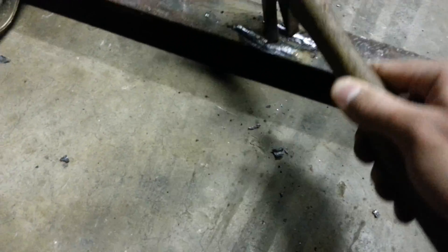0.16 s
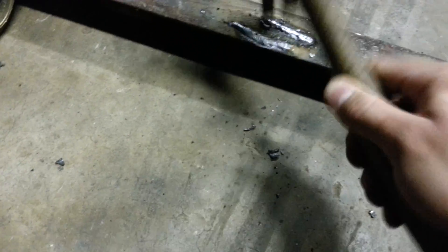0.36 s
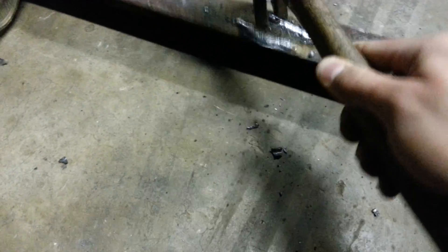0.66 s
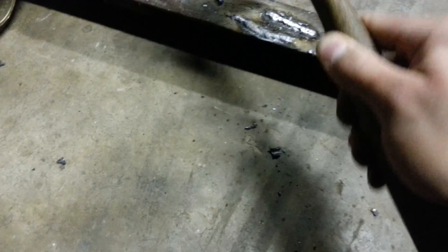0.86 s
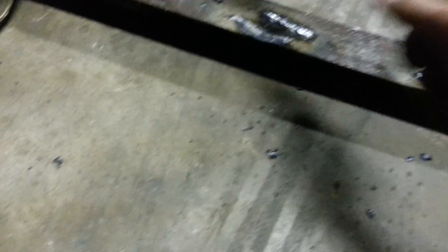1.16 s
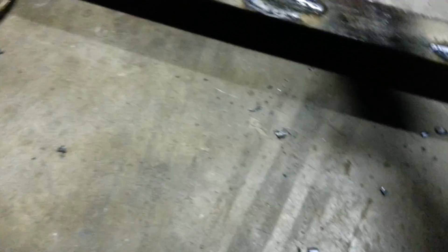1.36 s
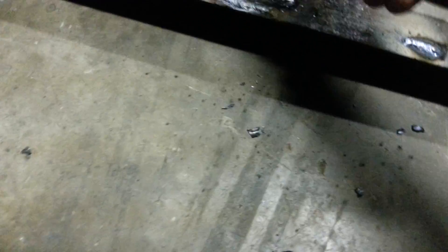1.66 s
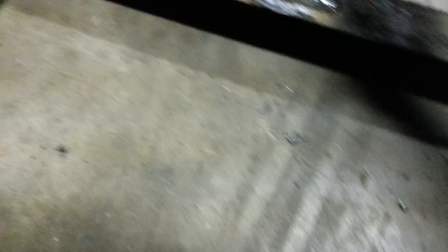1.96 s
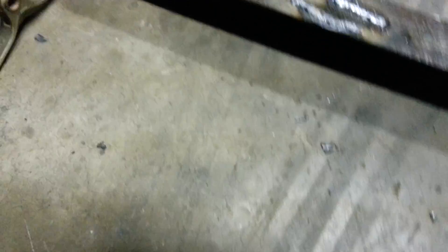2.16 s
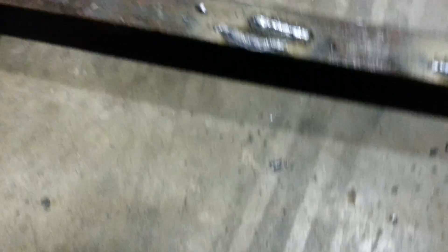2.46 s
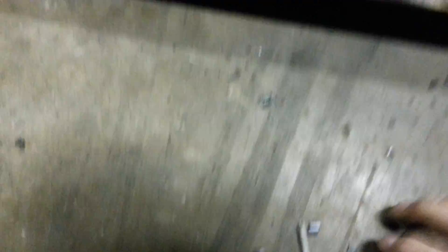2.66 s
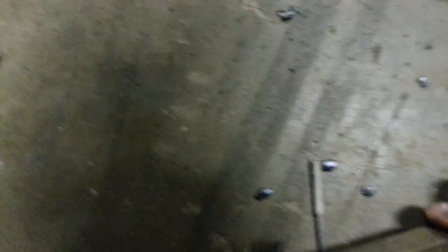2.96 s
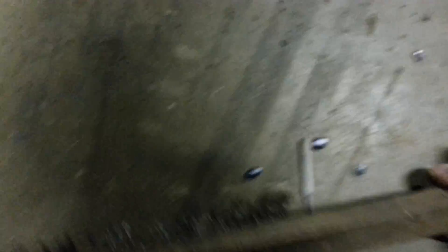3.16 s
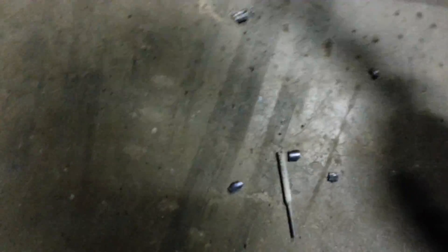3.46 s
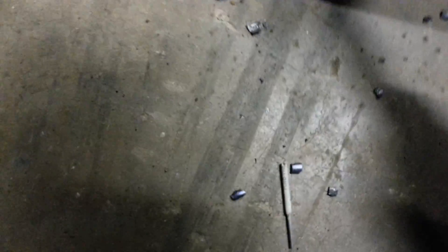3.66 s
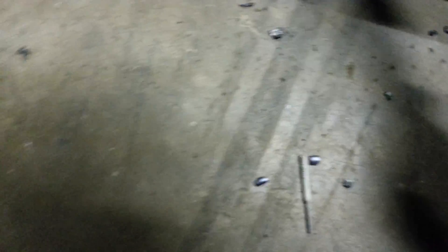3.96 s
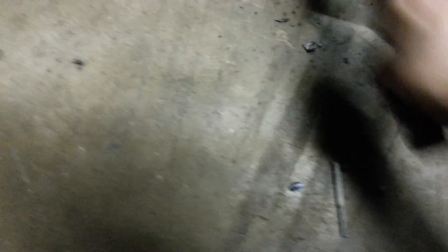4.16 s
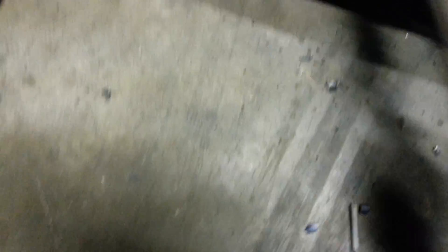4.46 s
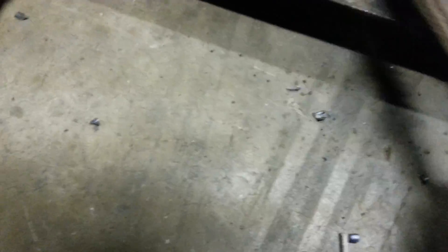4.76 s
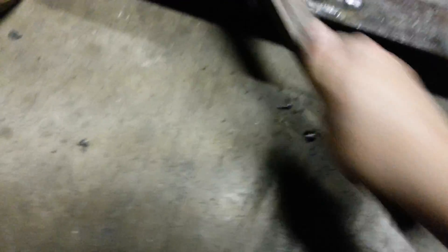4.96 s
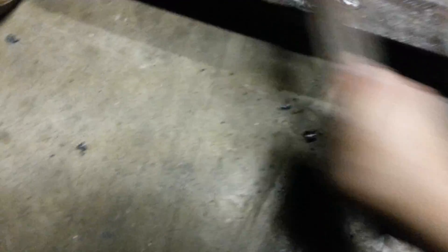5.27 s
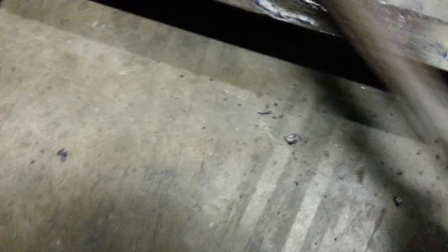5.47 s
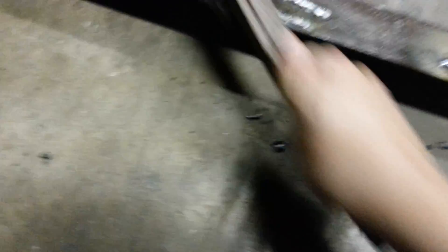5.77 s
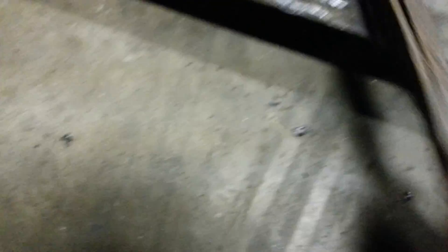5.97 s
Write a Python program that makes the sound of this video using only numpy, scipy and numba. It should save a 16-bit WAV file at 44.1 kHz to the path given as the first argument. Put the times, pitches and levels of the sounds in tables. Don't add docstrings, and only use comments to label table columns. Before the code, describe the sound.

Close, clipped hammering on ringing steel, the hammer set down and bouncing to rest, a short wooden drag, then brisk to-and-fro wire-brush scrubbing.

```python
import sys
import numpy as np
from scipy import signal
from scipy.fft import rfft, irfft
from scipy.io import wavfile
from scipy.ndimage import uniform_filter1d
from numba import njit

SR = 44100
rng = np.random.default_rng(int(sys.argv[2]) if len(sys.argv) > 2 else 0)


def transcribe(signal):
    frames = np.atleast_2d(signal).T
    limited = np.clip(frames, -1, 1)
    pcm = np.round(limited * 32767).astype(np.int16)
    wavfile.write(sys.argv[1], SR, pcm)


def natural_amplitude(level_db):
    exponent = np.asarray(level_db, float) / 20
    return 10 ** exponent


N = 269892
HZ = np.arange(N // 2 + 1) * SR / N

# frequency in Hz, density in dB per Hz.
ROOM_COLOUR = [(18, -46), (30, -25), (75, -3.5), (154, -6), (228, -8.5), (296, -6), (415, -14), (581, -10),
               (774, -12), (2700, -17), (5730, -30), (12200, -28.5), (15000, -25)]
ROOM_DB, ROOM_WAVER_DB = -49.5, 0.8
# time in seconds, level in dB.
MACHINE_LEVEL = [
    (0, -46),
    (1.4, -42),
    (2.2, -45.5),
    (3.0, -43.5),
    (3.3, -51.5),
    (3.6, -85.5),
    (6.12, -59.5),
]
# frequency in Hz, density in dB per Hz.
MACHINE_COLOUR = [(35, -40.5), (60, -23), (79, -13.5), (122, -18.5), (194, 0), (404, -1), (727, 1),
                  (1480, -6), (1680, -11.5), (9000, -41.5), (11700, -79.5), (19800, -120)]
# frequency in Hz, left-right likeness from 0 to 1.
PORT_LIKENESS = [(60, 0.7), (130, 0), (290, 0.55), (640, 0.5), (1410, 0), (3090, 0), (6800, 0), (15000, 0)]
# frequency in Hz, left minus right in dB.
PORT_LEAN = [(60, -1), (110, 1.5), (200, 1), (380, 3.5), (700, -2), (1290, 0.5), (2380, 4.5), (4390, 11),
             (8110, 2), (15000, -1)]
TOP_HZ = 14750
# frequency in Hz, threshold against the whole sound in dB.
MUTE_BELOW = [(100, -44), (300, -31), (600, -35.5), (1000, -35), (4000, -44), (8000, -41), (14000, -40.5)]

# time in seconds, peak in dB, pitch in Hz.
EDDIES = [(3.905, -31.5, 152), (4.029, -19, 280), (4.051, -18.5, 201), (4.1, -21.5, 223),
          (4.149, -23.5, 200), (4.981, -19, 194), (4.990, -7.5, 700), (5.005, -10.5, 360),
          (5.015, -11, 176), (5.045, -6.5, 268), (5.183, -26.5, 175), (5.386, -2, 412), (5.417, -3.5, 447),
          (5.45, -16, 252), (5.471, -12, 343), (5.501, -25, 201), (5.512, -18, 342), (5.53, -21.5, 170)]
WAKE_TURNS, WAKE_DB, WAKE_PITCH, WAKE_LOW_HZ = 2.975, -7, 0.584, 170

# frequency in Hz, density in dB per Hz.
DRAG_COLOUR = [(47, -50), (80, -20), (161, -15), (338, -10.5), (624, -1.5), (743, -15), (938, -4),
               (1240, -8), (1430, -3), (1890, -17.5), (2600, -17), (3380, -53.5), (5720, -120)]
DRAG_START_S, DRAG_END_S, DRAG_ATTACK_S, DRAG_RELEASE_S = 2.985, 3.187, 0.04, 0.085
DRAG_DB, DRAG_REST_DB = -24.5, -54.5
DRAG_GRIT_DB, DRAG_DUST_DB = -14, 9

# turn in seconds, pressure in dB.
STROKES = [(4.064, -32), (4.262, -33.5), (4.444, -30.5), (4.628, -32.5), (4.83, -30.5), (5.01, -31.5),
           (5.219, -29.5), (5.397, -31.5), (5.606, -30.5), (5.798, -33), (6.004, -29)]
LAST_TURN_S = 6.2
LANDING_DB = -8
PUSH, PULL = (-16.5, 2, 1.9, -8), (-12.5, -3.5, 1.66, -5.5)
# frequency in Hz, density in dB per Hz.
BRISTLE_COLOUR = [(88, -43), (150, 2.5), (357, -32.5), (515, -4.5), (674, -32.5), (742, -11.5), (1160, -8),
                  (1300, -7.5), (1700, -13.5), (3820, -22.5), (5720, -4), (13900, 4.5), (15000, -10.5)]
TUFT_HZ, TUFT_WIDTH_HZ, TUFT_DB = (1786, 5000, 7680, 10320, 13200), 2600, 3.5
# frequency in Hz, width in Hz, level in dB.
WELD_PEAKS = [(2864, 950, 1), (3276, 25, -12), (3740, 30, -6.5), (3753, 630, -2.06), (4356, 38, -13.5),
              (4500, 530, -7)]
# frequency in Hz, width in Hz, level in dB.
FLANGE_PEAKS = [(523, 82, -15), (667, 17, -9.5), (1080, 220, -9), (1174.3, 15, 4.5), (1828, 18, -7.5),
                (2046, 35, -7.5), (2267, 46, -4.5)]

# time in seconds, level in dB.
KNOCKS = [
    (3.59, -57),
    (3.787, -45),
    (3.94, -57.5),
    (4.0329, -36.5),
    (4.045, -54),
    (4.0733, -37),
    (4.564, -36),
    (4.671, -46),
    (5.64, -46.5),
]
# time in seconds, level in dB, decay share, swarm in dB, crack in dB.
BRUSH_RAP = [
    (3.0779, -34, 1.01, 16.6, 7.5),
]
# frequency in Hz, level in dB, 60 dB decay in seconds.
WOOD_MODES = [(2315, -10, 0.026), (3360, -3, 0.056), (4440, -8.5, 0.019)]
# frequency in Hz, level in dB.
WOOD_SWARM = [(300, 7), (1500, -11), (4000, -8.5), (14000, -8)]
# frequency in Hz, 60 dB decay in seconds.
WOOD_T60 = [(300, 0.012), (14000, 0.025)]

# time in seconds, level in dB.
BOUNCES = [
    (2.5202, -12),
    (2.6788, -11),
    (2.7716, -14.5),
    (2.8285, -22),
    (2.8669, -25),
]
BOUNCE_SWARM_DB, SWARM_LEFT = 8, 0.16
# frequency in Hz, level in dB, 60 dB decay in seconds.
SHANK_MODES = [(98, -23.5, 0.083), (2716, 6, 0.55), (3000, -12, .25), (4300, -15.5, 0.5), (4990, -1, 0.21),
               (7150, -21, 0.12)]
# frequency in Hz, density in dB per Hz.
SHANK_SWARM = [(47, -68), (80, -49.5), (188, -17), (699, -22), (2490, -14.5), (2720, 3), (3170, -9),
               (5020, -6), (5600, -24.5), (6670, -16), (8300, -25), (12600, -30.5), (15000, -46)]
# frequency in Hz, 60 dB decay in seconds.
SHANK_T60 = [(100, 0.23), (1500, 0.38), (4000, 0.45), (8000, 0.25), (13000, 0.096)]

# time in seconds, level in dB, decay share, swarm in dB, crack in dB.
TOUCH = [
    (2.2468, -22.5, 1.07, 7.5, 8),
]
# frequency in Hz, level in dB, 60 dB decay in seconds.
TIP_MODES = [(110, -9, 0.087), (1067, -15, 0.56), (3250, 0, 0.34), (4880, 4.5, 0.063), (6040, 8, 0.39),
             (7370, -18.5, 0.085), (9180, -23, .3)]
# time in seconds, level in dB, decay share, swarm in dB, crack in dB.
CLINK = [
    (2.2992, -17, 1.01, -11, 20),
]
# frequency in Hz, level in dB, 60 dB decay in seconds.
FACE_MODES = [(1400, -6, 0.35), (2690, 7.5, 0.069), (7300, -21, .3)]
# time in seconds, level in dB, hardness in dB.
ROCKS = [
    (2.3286, -26.5, 4),
    (2.345, -31, -15.5),
    (2.362, -31, -0.5),
    (2.412, -28, -7),
    (2.436, -31, -8.5),
    (2.4902, -32, -2),
]
# frequency in Hz, level in dB, 60 dB decay in seconds.
HEAD_MODES = [(464.5, -7.5, 0.14), (1467, -3.5, 0.18), (2700, -4.5, 0.11), (4320, -10, .06),
              (4900, -9, 0.11), (7360, -5.5, 0.19), (9540, -29.5, .3), (14290, -24, .25)]
# frequency in Hz, density in dB per Hz.
BENCH_SWARM = [(47, -55), (80, -24.5), (461, -3.5), (2180, -5), (2660, -9.5), (3100, -7), (4500, -13.5),
               (5600, -50), (5980, -28), (7440, -27), (15000, -67.5)]
# frequency in Hz, 60 dB decay in seconds.
BENCH_T60 = [(100, 0.084), (1000, 0.26), (4000, 0.16), (12000, .03)]

# time in seconds, level in dB.
CRUMBS = [
    (1.70, -44),
    (1.746, -39),
    (1.758, -34),
    (1.795, -35),
    (1.858, -40),
    (1.883, -43),
    (1.912, -48),
]
# frequency in Hz, level in dB, 60 dB decay in seconds.
SLAG_MODES = [(2520, -6, .05), (3270, 2, 0.057), (5000, 7, .04), (8600, -4, 0.045), (12100, -19, .03)]
# time in seconds, level in dB, decay share, swarm in dB, crack in dB.
PRESS = [
    (1.6247, -20, 1.19, 3, 17),
]
# frequency in Hz, level in dB, 60 dB decay in seconds.
HELD_MODES = [(1242, 10, 0.22), (1400, 4, 0.29), (2030, 4.5, 0.49), (2470, 2.5, 0.65), (3320, -1.5, 1),
              (5120, -11, 1), (8800, -18, 0.28)]
# frequency in Hz, density in dB per Hz.
HELD_SWARM = [(47, -43), (80, -17), (587, -7.5), (1470, 2), (1750, -3.5), (2490, -7), (2970, -9.5),
              (3240, -7), (6390, -26.5), (12000, -31), (15000, -68)]
# frequency in Hz, 60 dB decay in seconds.
HELD_T60 = [(100, 1), (1000, 0.53), (4000, 0.51), (12000, 0.31)]

# time in seconds, level in dB, crack in dB.
BLOWS = [
    (-.112, -5.5, 9),
    (0.1526, -5.5, 13),
    (0.4097, -4.5, 12),
    (.6823, -2.5, 13),
    (0.9469, -3.5, 12.5),
]
# frequency in Hz, level in dB, 60 dB decay in seconds.
BEAM_MODES = [(687, -13.5, .5), (1076, -6, 0.31), (1263, 1, .4), (1320, 4, .45), (1592, -6, 0.2),
              (1710, -9.5, .45), (1972, -1, .55), (2060, -3.5, 0.49), (2460, -5.5, .4), (2730, -7.5, 0.39),
              (3110, -5.5, .3), (3220, -7.5, 0.52), (3638, -4, .5), (4380, -10, 0.42)]
# frequency in Hz, density in dB per Hz.
BEAM_SWARM = [(47, -54.5), (80, -30.5), (404, -19.5), (684, -18), (833, -16), (1350, 1.5), (1570, -9.5),
              (2000, -10), (3690, -14.5), (4700, -20), (10800, -28.5), (13700, -40), (15000, -85.5)]
# frequency in Hz, 60 dB decay in seconds.
BEAM_T60 = [(100, 0.53), (600, 0.53), (1300, 0.4), (3000, 0.44), (6000, 0.29), (12000, 0.19)]


def over_hz(table, hz):
    f, v = np.transpose(table)
    return np.interp(np.log(np.maximum(hz, 1)), np.log(np.maximum(f, 1)), v)


def over_time(table):
    s, *columns = np.transpose(table)
    return [np.interp(np.arange(N) / SR, s, c, left=-120, right=-120) for c in columns]


def colour(x, db):
    y = irfft(rfft(x) * natural_amplitude(db), N)
    return y / np.sqrt(np.mean(y ** 2))


def peaks_db(table, hz):
    power = sum(natural_amplitude(2 * db) / (1 + (2 * (hz - f) / w) ** 2) ** 1.81 for f, w, db in table)
    return 10 * np.log10(power)


def walk(rate):
    k = int(SR / rate)
    steps = np.repeat(rng.standard_normal(N // k + 1), k)
    return 1.3 * uniform_filter1d(uniform_filter1d(steps, k), k)[:N]


def wide(grain_db, near=0.):
    sizes = np.minimum(rng.exponential(size=N), 4)
    mid, side = rfft(rng.standard_normal((2, N)) * natural_amplitude(grain_db * sizes))
    c = np.clip(over_hz(PORT_LIKENESS, HZ) + near, 0, .98)
    return irfft(np.sqrt(1 + c) * mid + np.sqrt(1 - c) * side * np.array([[1], [-1]]), N)


def unit(db):
    return db - 10 * np.log10(np.sum(natural_amplitude(2 * db)))


@njit
def add(out, start, hz, t60, gain, rise):
    skip = max(0, -start)
    for k in range(len(hz)):
        p = np.exp(2j * np.pi * hz[k] / SR - np.log(1000) / (t60[k] * SR))
        z, wait = p ** skip, rise ** skip
        for i in range(start + skip, min(out.shape[1], start + int(t60[k] * SR))):
            out[0, i] += (1 - wait) * (gain[0, k] * z).imag
            out[1, i] += (1 - wait) * (gain[1, k] * z).imag
            z, wait = z * p, wait * rise


def struck(hits, modes, swarm, swarm_t60, split, crack_s, count, contact_s=0.00033):
    out, rise = np.zeros((2, N)), np.exp(-1 / (contact_s * SR))
    hz, db, t60 = np.repeat(modes, 5, axis=0).T
    t60 = np.minimum(t60, .48)
    low, high = swarm[0][0], swarm[-1][0]
    for s, hit_db, share, swarm_db, crack_db in hits:
        place = (np.arange(count) + rng.random(count)) / count
        small = low + (high - low) * place ** 2
        small_db = over_hz(swarm, small) + 5 * np.log10(small)
        f = np.r_[hz * (1 + split * rng.uniform(-1, 1, len(hz))), small]
        luck = np.minimum(rng.standard_normal(count), 1.6)
        small_t60 = over_hz(swarm_t60, small) * natural_amplitude(3 * small / 8000 * luck)
        level_db = hit_db + np.r_[unit(db), unit(small_db) + swarm_db]
        size = natural_amplitude(level_db + 3.78 * rng.standard_normal((2, len(f))))
        chance = rng.random((3, len(f)))
        turn = np.exp(2j * np.pi * (chance[0] + np.clip(f / 1600, 0, 1) * (chance[1:] - .5)))
        gain = size * turn
        crack = gain * natural_amplitude(crack_db) * (f / 2000) ** 0.041
        add(out, int(s * SR), f, np.r_[t60, small_t60] * share, gain, rise)
        add(out, int(s * SR), f, np.full(len(f), crack_s), crack, rise)
    return out


def shop():
    tone = colour(wide(grain_db=2.5), over_hz(ROOM_COLOUR, HZ)) * natural_amplitude(ROOM_DB + ROOM_WAVER_DB * walk(6.6))
    machine = colour(wide(grain_db=5.0, near=0.5), over_hz(MACHINE_COLOUR, HZ))
    return tone + machine * natural_amplitude(over_time(MACHINE_LEVEL)[0] + 0.93 * walk(17))


def puffs():
    out, t = np.zeros(N), np.arange(-700, 700) / SR
    for (s, db, hz), chance in zip(EDDIES, rng.random((len(EDDIES), 3))):
        for phase in chance:
            turns = hz * t
            swing = np.cos(2 * np.pi * (turns - 0.33 * turns ** 2 + 0.95 * phase))
            out[int(s * SR) - 700:int(s * SR) + 700] += natural_amplitude(db) * np.exp(-(turns / 0.75) ** 2) * swing
            s += WAKE_TURNS * (0.396 + 1.213 * phase) / hz
            db, hz = db + WAKE_DB, max(hz * WAKE_PITCH, WAKE_LOW_HZ)
    return out * natural_amplitude(np.array([[0], [-32]]))


def drag():
    dust_db = DRAG_GRIT_DB + DRAG_DUST_DB
    level_db, grit_db = over_time([
        (DRAG_START_S - .02, DRAG_REST_DB, dust_db + DRAG_DUST_DB),
        (DRAG_START_S, DRAG_REST_DB + 1.5, dust_db),
        (DRAG_START_S + DRAG_ATTACK_S, DRAG_DB, DRAG_GRIT_DB),
        (DRAG_END_S, DRAG_DB - 2.5, DRAG_GRIT_DB),
        (DRAG_END_S + DRAG_RELEASE_S, DRAG_REST_DB, dust_db),
        (DRAG_END_S + 2 * DRAG_RELEASE_S, DRAG_REST_DB - 2, dust_db)])
    grains = wide(grain_db=5.0, near=0.24) * natural_amplitude(1.4 * walk(120))
    body = colour(grains, over_hz(DRAG_COLOUR, HZ))
    grit = colour(wide(grain_db=-0.5, near=0.21), peaks_db([(3400, 1200, 5), (8330, 6900, -10.0)], HZ))
    return natural_amplitude(level_db) * (body + natural_amplitude(grit_db) * grit)


def stroke_curves():
    ends = [row[0] for row in STROKES[1:]] + [LAST_TURN_S]
    shape = []
    for k, ((s, db), end) in enumerate(zip(STROKES, ends)):
        dip_db, swell_db, *ring = PULL if k % 2 else PUSH
        length = end - s
        shape += [(s, db + dip_db + (k == 0) * LANDING_DB, *ring),
                  (s + 0.25 * length, db - swell_db / 2 - 1.5, *ring),
                  (s + 0.52 * length, db + 0.12, *ring),
                  (s + 0.85 * length, db + swell_db / 2 - 2.5, *ring)]
    return [uniform_filter1d(c, size=500) for c in over_time(shape)]


def scrub():
    level_db, weld_db, flange_db = stroke_curves()
    tips = natural_amplitude(level_db + 0.58 * walk(60)) * wide(grain_db=1.0)
    scale = np.sqrt(np.mean(tips ** 2))
    bristle_db = over_hz(BRISTLE_COLOUR, HZ)
    hiss = colour(tips, bristle_db) * natural_amplitude(-7.5)
    for hz in TUFT_HZ:
        tuft = colour(tips, bristle_db + peaks_db([(hz, TUFT_WIDTH_HZ, 0)], HZ))
        hiss += tuft * natural_amplitude(TUFT_DB * walk(30) - 16.0)
    weld = np.zeros((2, N))
    for hz, width, db in WELD_PEAKS:
        waver_db = 4 if width < 200 else 1.2
        weld += colour(tips, peaks_db([(hz, width, db)], HZ)) * natural_amplitude(db + waver_db * walk(13))
    flange = colour(natural_amplitude(level_db) * wide(grain_db=1.0, near=0.48), peaks_db(FLANGE_PEAKS, HZ))
    flange *= natural_amplitude(flange_db - 2.0 + 3.8 * walk(21))
    return scale * (hiss + weld * natural_amplitude(weld_db - 9.5) + flange)


def brush_knocks():
    knocks = [(s, db, 2.3, 4, -6) for s, db in KNOCKS]
    return (struck(knocks, WOOD_MODES, WOOD_SWARM, WOOD_T60, split=0.036, crack_s=0.024, count=200, contact_s=0.0021)
            + struck(BRUSH_RAP, WOOD_MODES, HELD_SWARM, WOOD_T60, split=0.055, crack_s=0.017, count=300))


def shank_bounces():
    bounces = [(s, db, 1.05, BOUNCE_SWARM_DB * SWARM_LEFT ** k, 14.5) for k, (s, db) in enumerate(BOUNCES)]
    return struck(bounces, SHANK_MODES, SHANK_SWARM, SHANK_T60, split=0.003, crack_s=0.03, count=800)


def head_laid_down():
    rocks = [(s, db, 1.6, hard_db, hard_db + 7.5) for s, db, hard_db in ROCKS]
    return (struck(TOUCH, TIP_MODES, BENCH_SWARM, BENCH_T60, split=0.0017, crack_s=0.029, count=600)
            + struck(rocks, HEAD_MODES, BENCH_SWARM, BENCH_T60, split=0.0043, crack_s=0.019, count=500,
                     contact_s=0.00049)
            + struck(CLINK, FACE_MODES, BENCH_SWARM, BENCH_T60, split=0.0015, crack_s=0.023, count=500))


def slag_crumbs():
    crumbs = [(s, db, 1.6, -3, 1) for s, db in CRUMBS]
    return struck(crumbs, SLAG_MODES, HELD_SWARM, WOOD_T60, split=0.079, crack_s=.012, count=200, contact_s=.001)


def held_blow():
    return struck(PRESS, HELD_MODES, HELD_SWARM, HELD_T60, split=0.0087, crack_s=0.078, count=400)


def beam_blows():
    blows = [(s, db, 1.196, 1.5, crack_db) for s, db, crack_db in BLOWS]
    return struck(blows, BEAM_MODES, BEAM_SWARM, BEAM_T60, split=.014, crack_s=0.084, count=800)


def scene():
    air = shop() + drag() + scrub() + brush_knocks() + shank_bounces()
    air += head_laid_down() + slag_crumbs() + held_blow() + beam_blows()
    lean = over_hz(PORT_LEAN, HZ) / 2
    ends = (HZ < TOP_HZ) / np.sqrt(1 + (70 / np.maximum(HZ, 1)) ** 6)
    return irfft(rfft(air) * ends * natural_amplitude(np.array([lean, -lean])), N) + puffs()


def mute_weak_bands(x):
    hz, _, z = signal.stft(x, SR, nperseg=2048)
    band = np.arange(60)
    edges = np.unique((4 * band * 1.025 ** band).astype(int).clip(0, 1024))
    power = np.add.reduceat(abs(z) ** 2, edges, axis=1)
    limit_db = 2 * over_hz(MUTE_BELOW, hz[edges] + 40)[:, None] + 5 * rng.standard_normal(power.shape)
    keep = power > power.sum(axis=1, keepdims=True) * natural_amplitude(limit_db)
    keep = np.repeat(keep, np.diff(np.r_[edges, len(hz)]), axis=1)
    return signal.istft(z * keep, SR, nperseg=2048)[1][:, :N]


def top_cut(x):
    return signal.sosfilt(signal.butter(12, 15570, fs=SR, output="sos"), x)


def record(dry):
    mix = mute_weak_bands(np.clip(dry, -.99, .99))
    return top_cut(mix)


dry = scene()
out = record(dry)
transcribe(out)
```